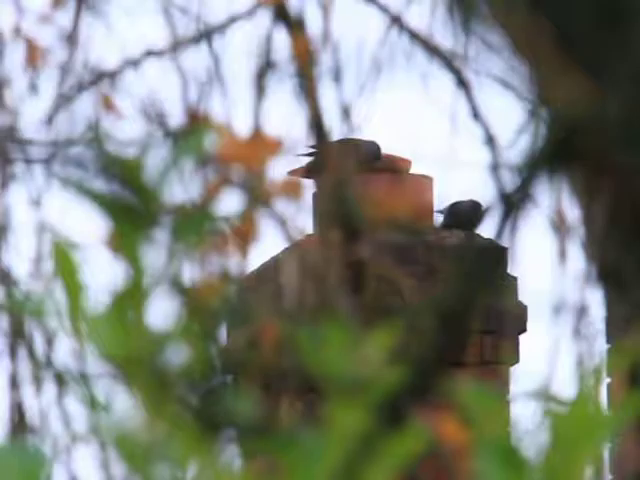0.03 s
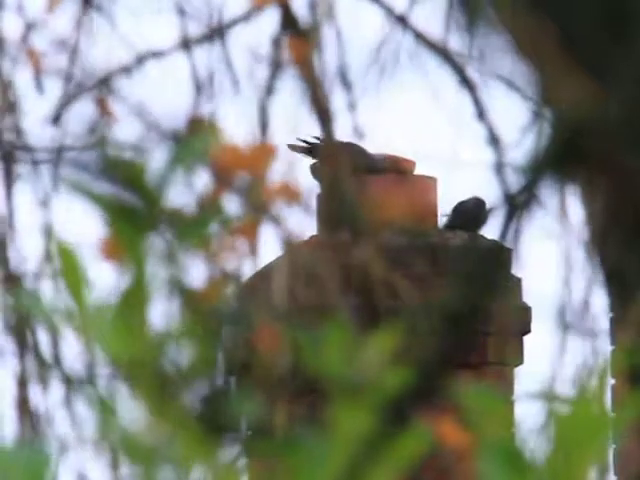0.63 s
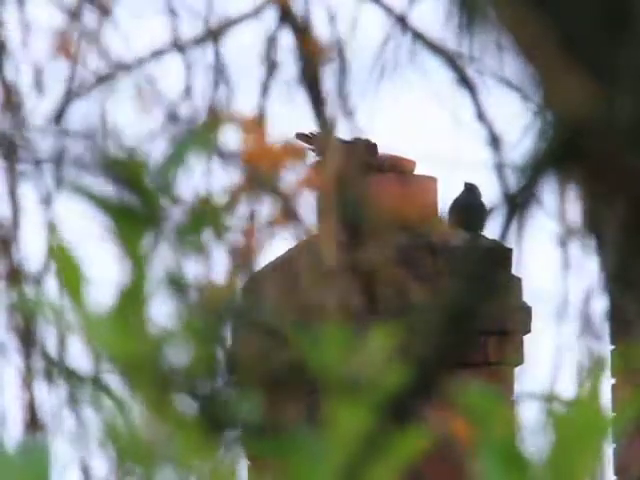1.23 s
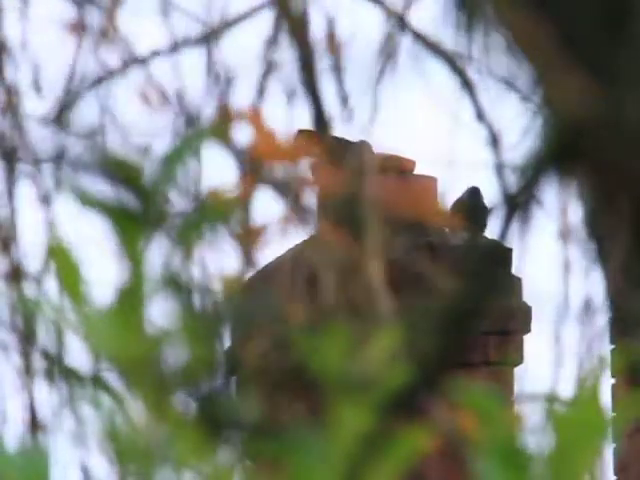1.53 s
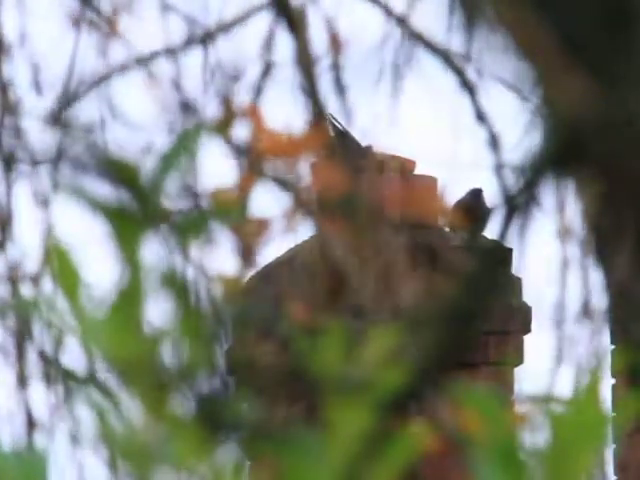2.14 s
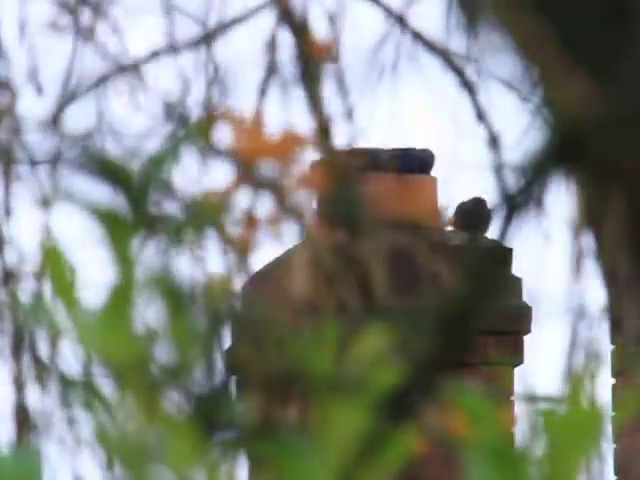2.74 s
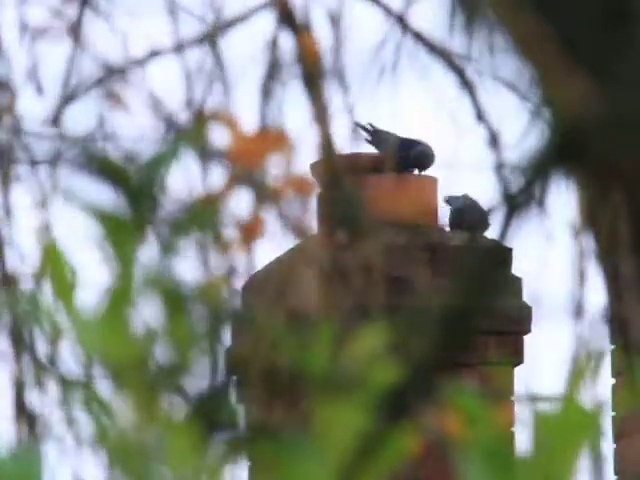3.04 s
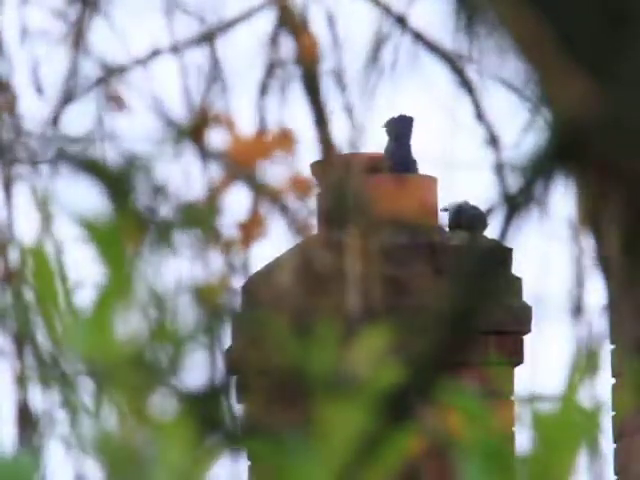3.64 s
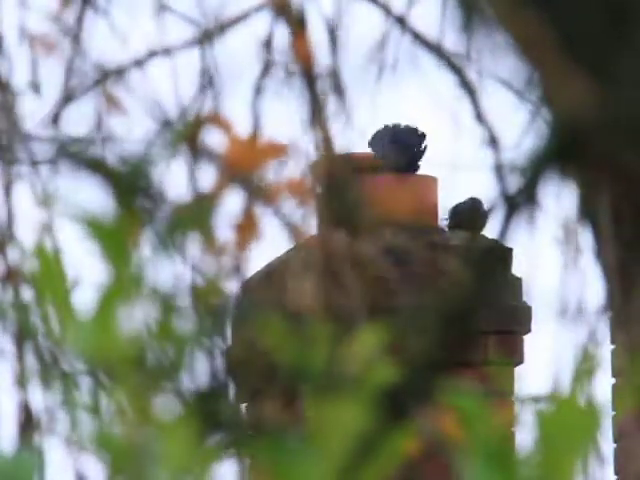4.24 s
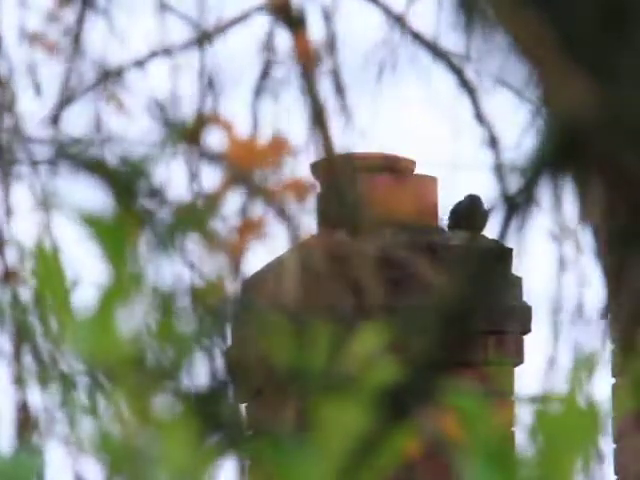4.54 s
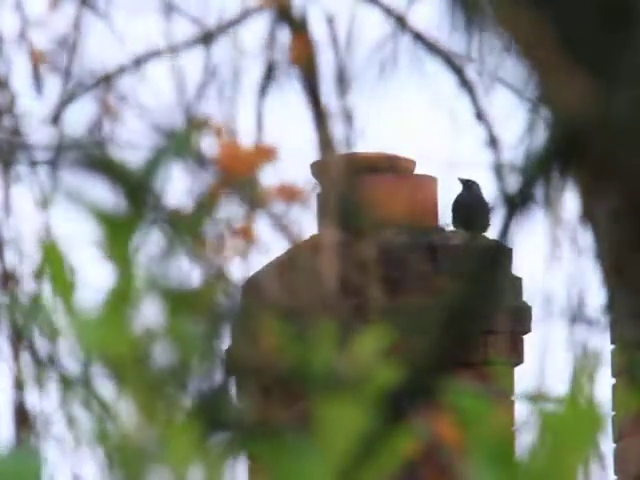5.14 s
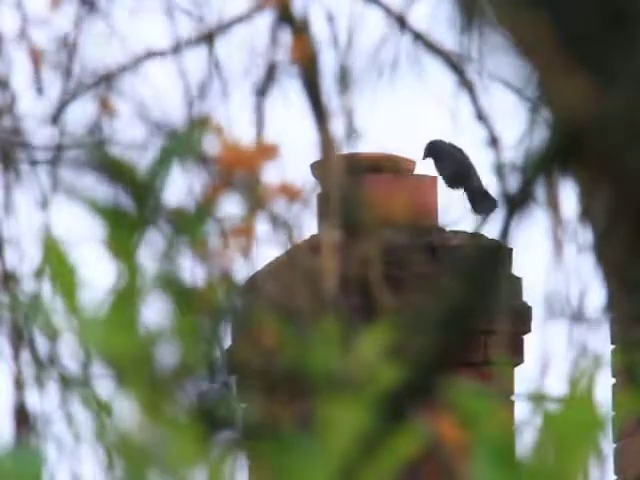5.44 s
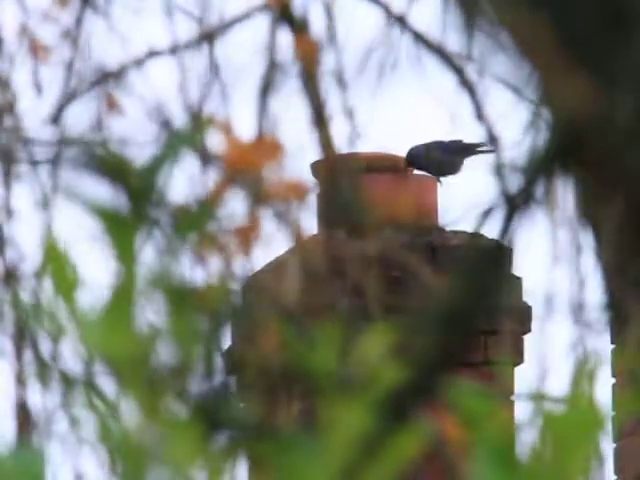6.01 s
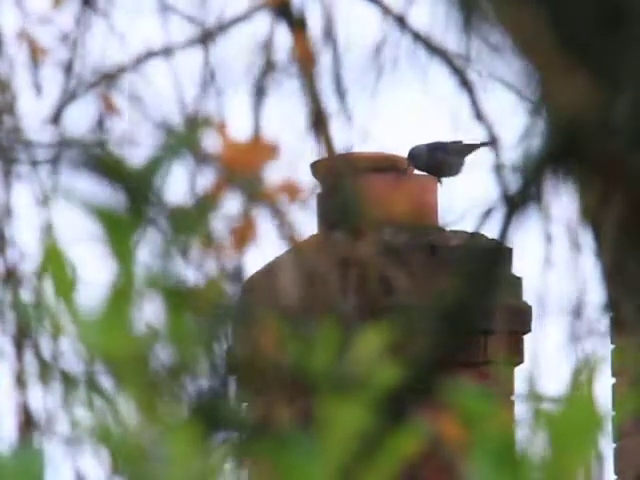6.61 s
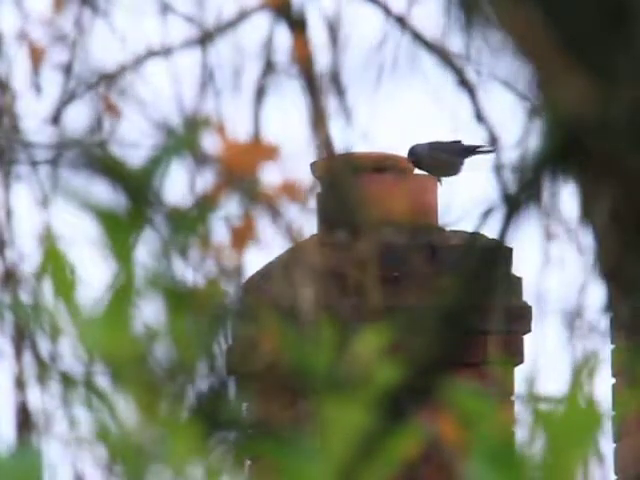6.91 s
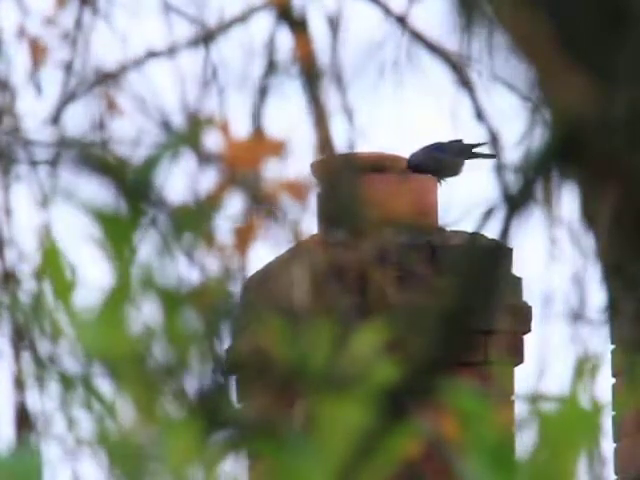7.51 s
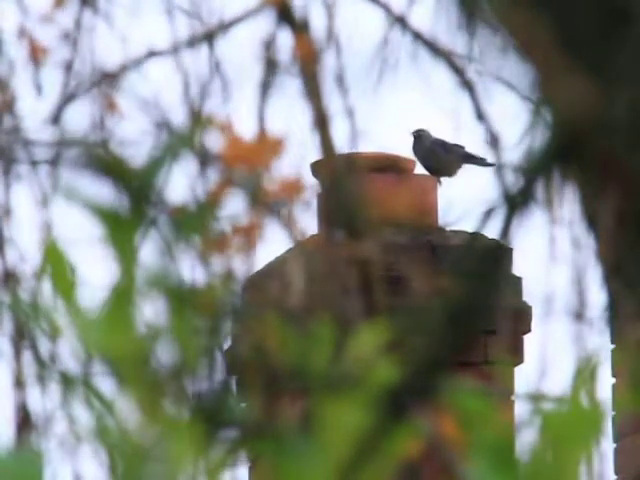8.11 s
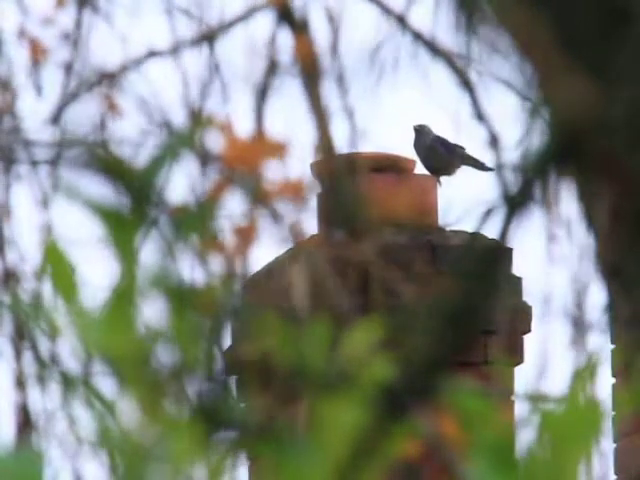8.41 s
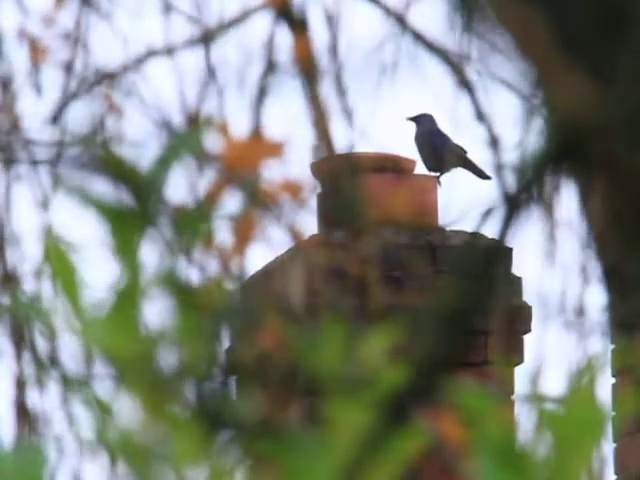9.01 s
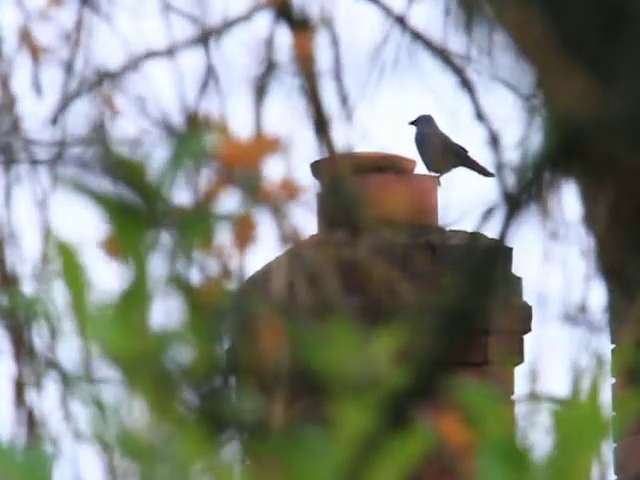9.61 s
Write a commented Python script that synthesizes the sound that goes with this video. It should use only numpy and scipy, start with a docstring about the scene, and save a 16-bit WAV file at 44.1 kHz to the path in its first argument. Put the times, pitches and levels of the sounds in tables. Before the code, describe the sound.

One sharp jackdaw call, a few quiet falling calls and brief wingbeats in a garden, with faint songbirds, traffic rumble and steady hiss.

```python
"""Jackdaws on a chimney, heard from a garden: one sharp chack, six soft contact calls, a flutter of wings.
Each call is a fast falling tone, strongest in its second harmonic, thrown back by the house walls.
Small birds whistle far off over distant traffic and microphone hiss; the sound fades in."""
import sys
import numpy as np
from scipy import signal
from scipy.fft import rfft, irfft, next_fast_len
from scipy.io import wavfile
from scipy.ndimage import map_coordinates

SR = 44100
rng = np.random.default_rng(int(sys.argv[2]) if len(sys.argv) > 2 else 0)


def file_out(sig):
    """Save sig as 16-bit WAV at sys.argv[1]."""
    # one column per channel
    cols = np.atleast_2d(sig).T
    # limit, then scale
    lim = np.clip(cols, -1, 1)
    pcm = np.round(lim * 32767).astype(np.int16)
    wavfile.write(sys.argv[1], SR, pcm)


N = 429975


def amp(db):
    """Decibels to gain."""
    return 10 ** (np.asarray(db) / 20)


def unit(x):
    """x at rms 1."""
    return x / np.sqrt(np.mean(x ** 2) + 1e-20)


def along(points, hz):
    """Interpolate (frequency [Hz], value) points on a log axis."""
    knots_hz, values = np.transpose(points)
    return np.interp(np.log(hz + 1), np.log(knots_hz + 1), values)


def wobble(rate_hz, size):
    """Smooth random curve, rate_hz knots a second."""
    knots = rng.standard_normal(int(size * rate_hz / SR) + 4)
    return map_coordinates(knots, [np.arange(size) * rate_hz / SR])


def filtered(x, response):
    """Zero-phase filter with gain response(hz)."""
    size = next_fast_len(N + SR // 2)
    return irfft(rfft(x, size) * response(np.fft.rfftfreq(size, 1 / SR)), size)[..., :N]


def noise(spectrum):
    """Coloured noise of rms 1."""
    return unit(filtered(rng.standard_normal(N), lambda hz: amp(along(spectrum, hz))))


def add(track, start_s, sound):
    """Mix a sound into a track."""
    part = track[round(start_s * SR):][:len(sound)]
    part += sound[:len(part)]


def pan(x, db):
    """Stereo, left db louder than right."""
    return x * amp([[db / 2], [-db / 2]])


def traffic_and_hiss(mid_db=-50, swell_db=0.34, flicker_db=.5, crossover_hz=2500, drone_db=-68):
    """Distant traffic swells gently below steady microphone hiss; far engines drone."""
    # Rumble and hiss: (frequency [Hz], relative density [dB])
    spectrum = [(13, -29), (22, -7), (27, -11), (32, -14.5), (44, -7.5), (59, -3), (108, -10.5), (135, -10),
                (625, -9.5), (944, -8.5), (1140, -9.5), (2530, -20.5), (5930, -24.5), (14300, -26),
                (15500, -26.5)]
    # Stereo width: (frequency [Hz], side minus mid [dB])
    width = [(30, -13), (60, -8), (110, -7), (200, -3.5), (380, -5), (1290, -5.5), (2380, -1.5), (4400, -1)]
    # Engine drone: (frequency [Hz], relative density [dB])
    drone = [(35, -43), (52, -20), (60, 4), (68, -4), (82, -7), (105, -40)]
    mid = noise(spectrum)
    side = filtered(noise(spectrum), lambda hz: amp(along(width, hz)))
    bed = amp(mid_db) * np.array([mid + side, mid - side])
    road = filtered(bed, lambda hz: 1 / (1 + (hz / crossover_hz) ** 4))
    hiss = bed - road
    flow = amp(swell_db * wobble(1.5, N) + flicker_db * wobble(12, N))
    return hiss + flow * road + amp(drone_db) * noise(drone)


def songbirds(slur=0.0203, waver=.012, fade_db=5.5, flutter_db=4.0, faint_count=7, faint_db=-63):
    """Thin, slightly falling whistles that flutter on their way through the trees."""
    # Far notes: (time [s], length [s], pitch [Hz], level [dB])
    whistles = [(3.05, .05, 5330, -57), (3.12, 0.162, 5150, -62), (3.20, .17, 4600, -60),
                (3.345, .11, 5300, -60), (3.52, .05, 4620, -57), (4.60, .06, 3380, -61),
                (4.643, 0.115, 3990, -56), (4.765, .06, 3400, -53), (6.495, .055, 3880, -57)]
    faint = [(np.interp(when, [0, 1], (2.8, 7.3)), .06, np.interp(height, [0, 1], (3300, 5140)), faint_db)
             for when, height in rng.random((faint_count, 2))]
    song = np.zeros(N)
    for start_s, length_s, pitch_hz, db in whistles + faint:
        size = int(length_s * SR)
        progress = np.linspace(0, 1, size)
        hz = pitch_hz * (1 - slur * progress) * (1 + waver * wobble(218, size))
        arch = np.sqrt(np.abs(np.sin(np.pi * progress)))
        gain = amp(db - fade_db * progress + flutter_db * wobble(69, size))
        add(song, start_s, arch * gain * np.sin(2 * np.pi * np.cumsum(hz) / SR))
    return song


def garden(x, gap_s=.012, side_db=-3):
    """Scatter from trees and walls; treble dies first."""
    # Reverberation: (frequency [Hz], T60 [s])
    decay = [(300, 0.51), (2500, 0.51), (8000, 0.16)]
    hz, t, spectra = signal.stft(rng.standard_normal((2, SR * 3 // 4)), SR, nperseg=256)
    decay_db = -60 * t / along(decay, hz)[:, None]
    _, (mid, side) = signal.istft(spectra * amp(decay_db), SR, nperseg=256)
    tail = np.array([mid + amp(side_db) * side, mid - amp(side_db) * side]) / np.linalg.norm(mid)
    delayed = np.pad(x, (round(gap_s * SR), 0))
    return signal.fftconvolve(delayed[None], tail, axes=1)[:, :N]


def walls(x):
    """Discrete echoes from roofs and house fronts."""
    # Reflections: (delay [s], gain [dB], left minus right [dB])
    echoes = [(.023, -13, -1), (.040, -11.5, -1), (.063, -12, 3), (.092, -20, 4)]
    return sum(pan(np.pad(x, (round(delay_s * SR), 0))[:N] * amp(db), pan_db)
               for delay_s, db, pan_db in echoes)


def wings(rustle_db=1.8):
    """Each stroke is a swell of slightly crackling feather noise."""
    # Wing strokes: (peak time [s], peak level [dB], half-width [s])
    strokes = [(6.612, -54, .016), (6.673, -45, 0.011), (6.726, -46.5, 0.013), (6.796, -46, 0.012)]
    # Feather noise: (frequency [Hz], relative density [dB])
    feathers = [(500, -40), (1100, -1), (1500, 2.5), (2200, 0.5), (3300, -1.5), (4000, -7), (4700, -4),
                (5500, -6.5), (6100, -16), (12000, -43)]
    t = np.arange(N) / SR
    push = sum(amp(db) / (1 + ((t - peak_s) / half_s) ** 2) for peak_s, db, half_s in strokes)
    return push * unit(noise(feathers) * amp(rustle_db * wobble(400, N)))


def throat(x):
    """Throat and beak pass 1-3.5 kHz and a weak band near 6.5 kHz."""
    # Vocal tract: (frequency [Hz], gain [dB])
    response = [(500, -20), (1000, -1.5), (3400, 0), (4200, -17.5), (5800, -17), (6600, -8), (7600, -20.5),
                (10000, -30)]
    return filtered(x, lambda hz: amp(along(response, hz)))


def call(pitch_hz, level_db, harmonics_db, rasp, rough_db, rough_hz,
         jitter=0.0084, edge_s=0.0019, slip_rad=1.54, flutter_db=3):
    """Short tone with wavering harmonics; rasp makes its cycles uneven in timing and strength."""
    size = len(pitch_hz)
    t = np.arange(size) / SR
    hz = pitch_hz * (1 + jitter * wobble(530, size))
    phase = 2 * np.pi * np.cumsum(hz) / SR + slip_rad * rasp * wobble(707, size)
    tone = sum(amp(db + rough_db * wobble(rough_hz, size)) * np.sin(k * phase)
               for k, db in enumerate(harmonics_db, 1))
    edges = np.clip(np.minimum(t, t[-1] - t) / edge_s, 0, 1)
    return amp(level_db + flutter_db * rasp * wobble(570, size)) * edges * tone


def contact_calls(lead_in_db=-11.5, swell_s=.011, release_s=0.0075, sag_hz=70, sag_s=0.0034):
    """Quiet falling jackdaw calls: each starts softly, swells, then sags in pitch as the voice stops."""
    # Calls: (time [s], length [s], lead-in [s], start pitch [Hz], end pitch before sag [Hz], level [dB])
    calls = [(5.330, 0.051, .024, 1285, 997, -43), (5.519, 0.055, .003, 1244, 970, -43),
             (5.789, 0.0375, .018, 1190, 948, -40.5), (5.956, 0.049, 0.035, 1235, 1070, -41),
             (6.110, .043, 0.02, 1185, 954, -40.5), (6.383, 0.037, 0.012, 1128, 1020, -43.5)]
    # Harmonics, fundamental first: (level [dB])
    harmonics_db = [-3.5, 0.5, -17.5, -19]
    voice = np.zeros(N)
    for start_s, length_s, lead_in_s, start_hz, end_hz, db in calls:
        t = np.arange(0, length_s, 1 / SR)
        glide_hz = start_hz + (end_hz - start_hz) * t / length_s
        pitch_hz = glide_hz - sag_hz * np.exp((t - length_s) / sag_s)
        level_db = db + lead_in_db * np.clip(.5 + (lead_in_s - t) / swell_s, 0, 1)
        release = np.clip((length_s - t) / release_s, 0, 1)
        tone = call(pitch_hz, level_db, harmonics_db, rasp=0.12, rough_db=3.0, rough_hz=198)
        add(voice, start_s, release * tone)
    return throat(voice)


def chack():
    """One loud jackdaw call that starts clean and breaks into a rasp as it falls."""
    # Voice contour: (time [s], pitch [Hz], level [dB], rasp [0-1])
    contour = [(3.109, 1613, -42, .12), (3.114, 1530, -34, .03), (3.122, 1454, -30, 0.03),
               (3.131, 1360, -30.5, 0.14), (3.138, 1126, -42, 0.45), (3.151, 963, -40, .35),
               (3.170, 800, -44, 0.5)]
    # Harmonics, fundamental first: (level [dB])
    harmonics_db = [-10, -1, -13, -14, -14.5]
    times_s, *controls = np.transpose(contour)
    t = np.arange(times_s[0], times_s[-1], 1 / SR)
    pitch_hz, level_db, rasp = (np.interp(t, times_s, control) for control in controls)
    voice = np.zeros(N)
    add(voice, times_s[0], call(pitch_hz, level_db, harmonics_db, rasp, rough_db=2.3, rough_hz=336))
    return throat(voice)


def scene(chack_wet_db=-8.5, contact_wet_db=-16, contact_echo_db=-6, wing_wet_db=-12,
          song_dry_db=-4, song_wet_db=-6, beam_hz=2800):
    """Birds in the garden; the chack raises the most echo."""
    sharp, soft, flutter, song = chack(), contact_calls(), wings(), songbirds()
    direct = pan(sharp + soft + flutter, db=-.8) + amp(song_dry_db) * song
    # The open beak beams treble forward, so a duller chack reaches the surroundings.
    dull = filtered(sharp, lambda hz: 1 / np.sqrt(1 + (hz / beam_hz) ** 10))
    echoes = walls(dull + amp(contact_echo_db) * soft)
    scatter = garden(amp(chack_wet_db) * dull + amp(contact_wet_db) * soft
                     + amp(wing_wet_db) * flutter + amp(song_wet_db) * song)
    return direct + echoes + scatter + traffic_and_hiss()


def record(dry, top_hz=15850):
    """Linear fade-in, band limit and a small DC offset."""
    # Fade-in: (start [s], end [s])
    fade_s = (0.087, 1.975)
    # DC, left then right: (offset [full scale])
    offset = [
        [.0091],
        [.0193],
    ]
    fade = np.interp(np.arange(N) / SR, fade_s, [0, 1])
    return filtered(dry * fade, lambda hz: hz < top_hz) + fade * np.array(offset)


dry = scene()
out = record(dry)
file_out(out)
```